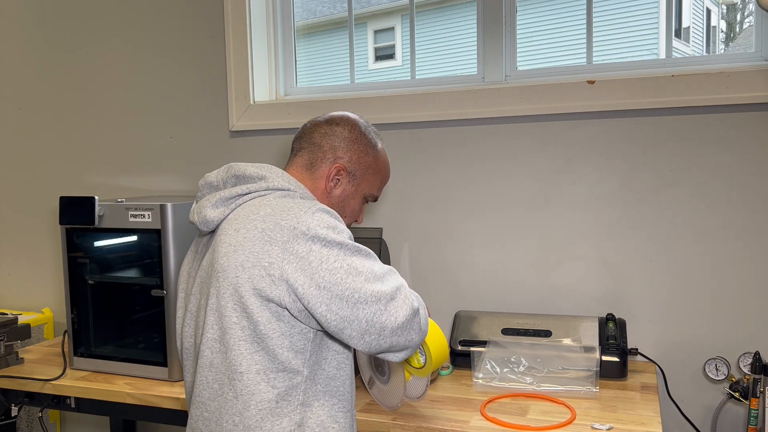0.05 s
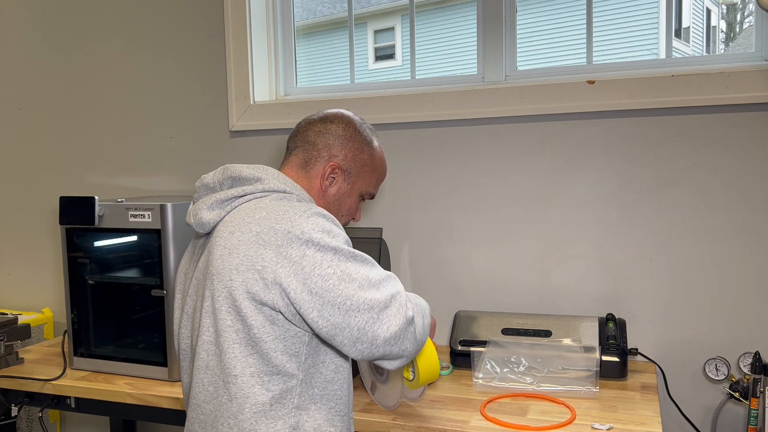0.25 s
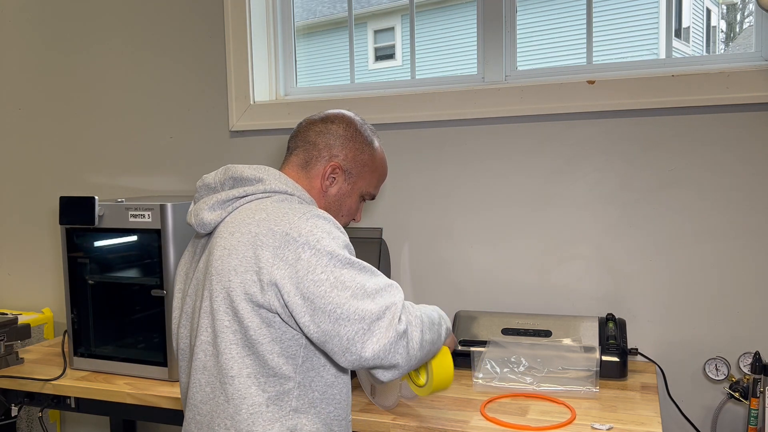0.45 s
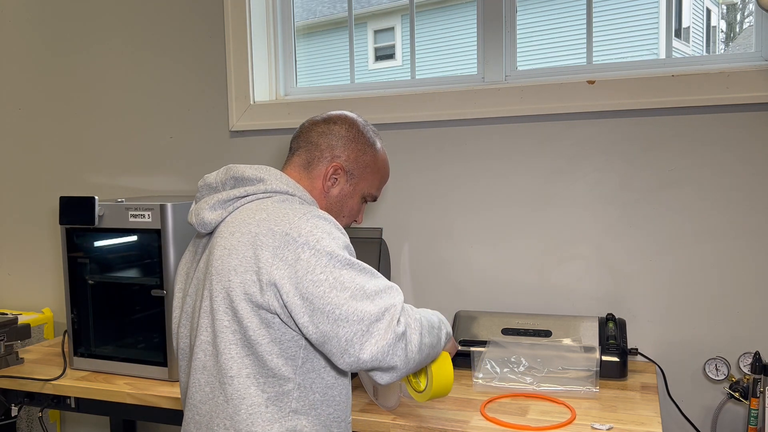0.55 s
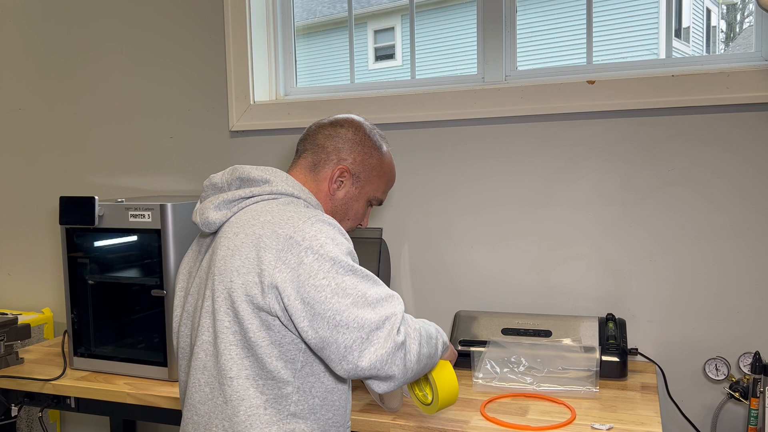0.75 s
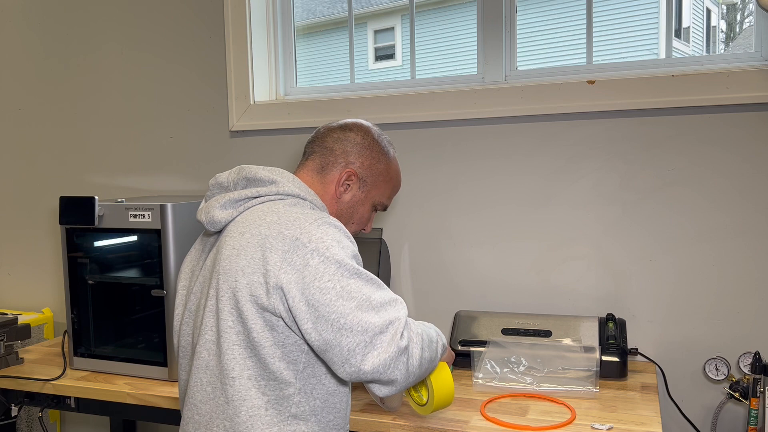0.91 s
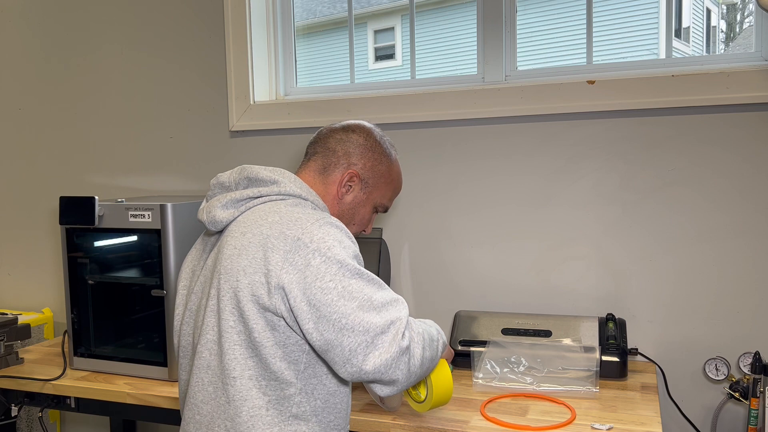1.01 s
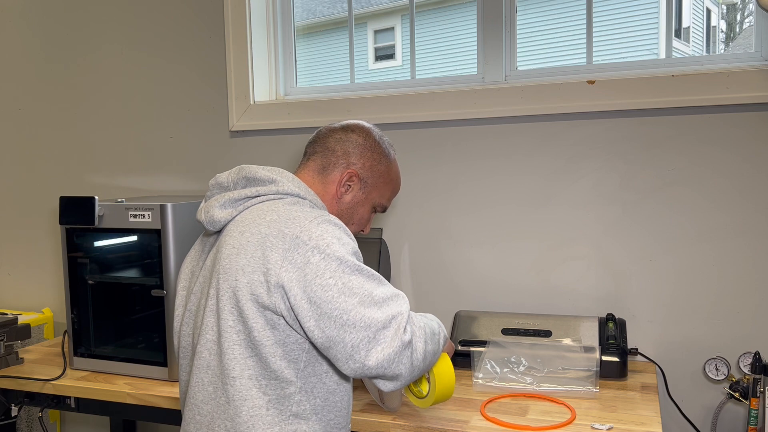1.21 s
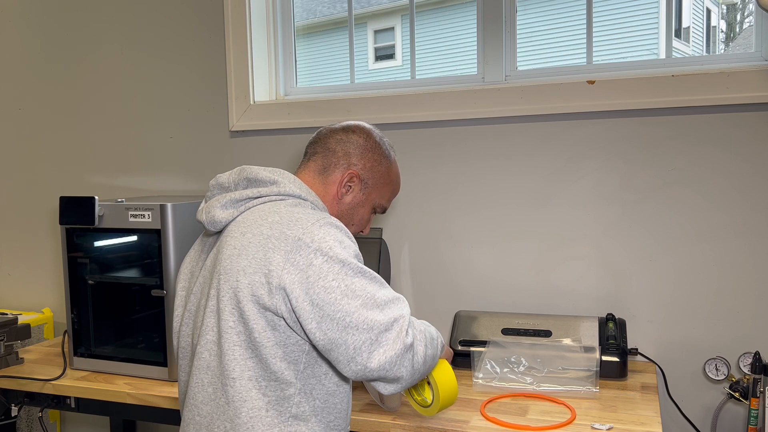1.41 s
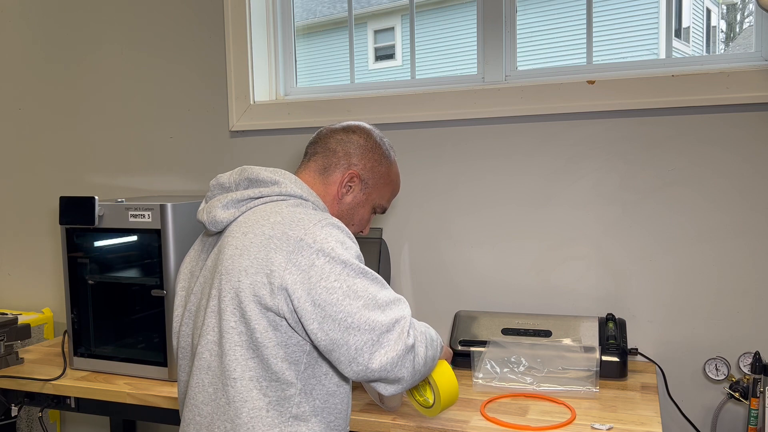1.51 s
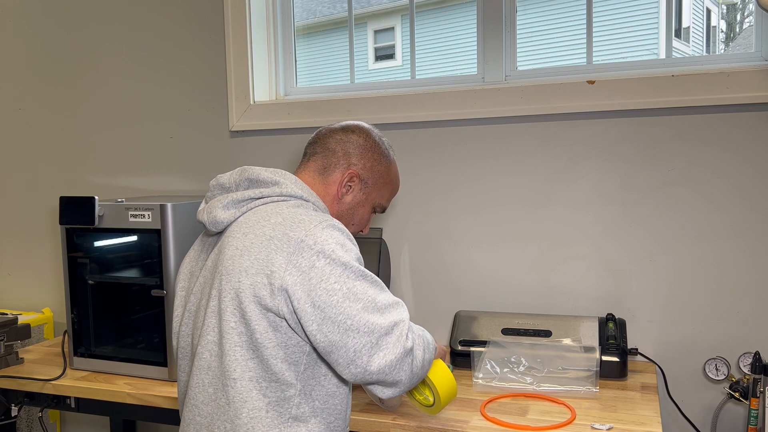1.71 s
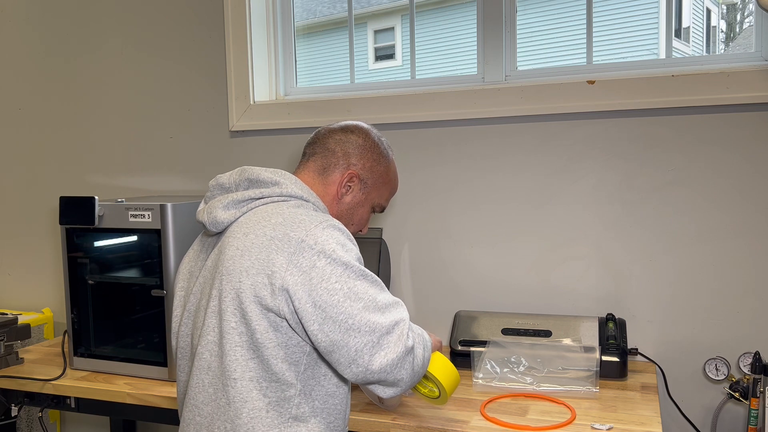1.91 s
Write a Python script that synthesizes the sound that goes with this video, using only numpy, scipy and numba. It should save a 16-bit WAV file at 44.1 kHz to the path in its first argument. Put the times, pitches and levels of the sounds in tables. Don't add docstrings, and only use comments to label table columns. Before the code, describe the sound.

A short, loud tear of adhesive tape, followed by separate crackling snaps and a double tap on a bench

```python
import sys
import numpy as np
from scipy import signal
from scipy.fft import rfft, irfft
from scipy.io import wavfile
from scipy.ndimage import uniform_filter1d
from numba import njit

SR = 44100
rng = np.random.default_rng(int(sys.argv[2]) if len(sys.argv) > 2 else 0)


def log_audio(samples):
    frames = np.atleast_2d(samples).T
    limited = np.clip(frames, -1, 1)
    pcm = np.round(limited * 32767).astype(np.int16)
    wavfile.write(sys.argv[1], SR, pcm)


def gain_from_db(level_db):
    decades = np.asarray(level_db, float) / 20
    return 10 ** decades


N = 85995


def unit(x):
    return x / np.sqrt(np.mean(x ** 2))


def ring(x, peaks):
    click = np.zeros(4096)
    click[0] = 1
    response = np.zeros(4096)
    for k, (hz, width_hz, db) in enumerate(peaks):
        b, a = signal.iirpeak(hz, hz / width_hz, fs=SR)
        response += (-1) ** k * gain_from_db(db) * signal.lfilter(b, a, click)
    return signal.fftconvolve(x, response / np.sqrt(np.sum(response ** 2)))[:N]


@njit
def moving_ring(x, hz, width_hz):
    y, band, low = np.empty(len(x)), 0., 0.
    for i in range(len(x)):
        g, k = np.tan(np.pi * hz[i] / SR), width_hz / hz[i]
        v = (band + g * (x[i] - low)) / (1 + g * (g + k))
        band, low, y[i] = 2 * v - band, low + 2 * g * v, k * v
    return y


def walk(rate_hz):
    hold = int(SR / rate_hz)
    levels = rng.standard_normal(N)[:N // hold + 1]
    return unit(uniform_filter1d(np.repeat(levels, hold)[:N], hold))


def bursts(rows, col, fall_s):
    t = np.arange(N) / SR
    envelope = np.zeros(N)
    for row, fall in zip(rows, fall_s):
        envelope += gain_from_db(row[col]) * (t >= row[0]) * np.exp(-np.maximum(t - row[0], 0) / fall)
    return envelope


def strikes(rows, col, fall_s):
    grit_db = -4
    x = gain_from_db(grit_db) * rng.standard_normal(N) * bursts(rows, col, fall_s)
    for row, fall in zip(rows, fall_s):
        x[int(row[0] * SR)] += gain_from_db(row[col]) * np.sqrt(fall * SR / 2)
    return x


def slips(rate_hz):
    scatter_db, biggest = 3.5, 3
    when, size, sign = rng.random(N), rng.exponential(1, N), rng.standard_normal(N)
    clicks = (when < rate_hz / SR) * np.sign(sign)
    return unit(clicks * gain_from_db(scatter_db * np.minimum(size, biggest)))


# t/s, peel level/dB, fizz over body/dB, strip resonance f/Hz, strip over body/dB
PULL = [
    (0, -69, -26.5, 3210, 5),
    (.14, -59, -6, 2770, -12.5),
    (0.179, -45, -7, 3080, -10.5),
    (.215, -44.5, 3.5, 2900, -8.5),
    (0.248, -29, -0.5, 2570, 1),
    (0.298, -60.5, -13.5, 2600, -3),
    (.33, -26.5, -2.5, 2600, 0),
    (.41, -25.5, -2.5, 1900, -7),
    (0.488, -35.5, 9, 2470, -6.5),
]
# t/s, size/dB, fall/s, strip note f/Hz
JERKS = [(.165, -42.5, .006, 2200), (.1845, -28.5, 0.003, 2970), (0.1924, -28, 0.002, 2600),
         (0.216, -28, 0.002, 2850), (0.233, -25, .003, 3000), (0.2425, -24, 0.004, 2710),
         (0.2464, -25.5, .002, 2500), (0.2657, -7.5, 0.00037, 2780), (0.287, -35.5, 0.003, 2700),
         (.315, -18.5, 0.0012, 2550), (0.323, -26.5, 0.0015, 2600), (0.326, -14, 0.001, 2500),
         (0.3458, -21, 0.0017, 2700), (0.355, -12, 0.00048, 2030), (.3755, -20.5, .001, 2300),
         (.386, -20, 0.001, 2000), (.394, -20.5, .001, 1700), (.402, -17.5, .001, 1900),
         (.417, -20, .001, 1970), (.444, -28, .001, 2200), (0.464, -22.5, 0.00038, 2320),
         (0.469, -30, 0.00033, 2000)]
# f/Hz, width/Hz, level/dB
BODY = [(420, 250, -2.5), (904, 740, -4), (1650, 510, 0.5), (2700, 1360, 2.5), (3670, 1700, -5)]
# f/Hz, width/Hz, level/dB
FIZZ = [(4930, 1500, -4.5), (6650, 670, 1.5), (9160, 1700, 0), (13210, 1300, 3), (14370, 5400, -4)]


def peel():
    slip_rate_hz, flutter_db, flutter_hz, release_s = 3500, 2.5, 140, 0.014
    strip_width_hz, jerk_width_hz, jerk_ring_db = 650., 650, -3.5
    t = np.arange(N) / SR
    when, level_db, fizz_db, strip_hz, strip_db = np.array(PULL).T
    fade = np.exp(-np.maximum(t - when[-1], 0) / release_s)
    pull = fade * gain_from_db(np.interp(t, when, level_db) + flutter_db * walk(flutter_hz) - 5)
    drive = slips(slip_rate_hz) * pull
    drive += strikes(JERKS, col=1, fall_s=[j[2] for j in JERKS]) * gain_from_db(-6)

    body = ring(drive, BODY) * gain_from_db(-1)
    fizz = ring(drive * gain_from_db(np.interp(t, when, fizz_db)), FIZZ) * gain_from_db(2.5)
    note_hz = np.interp(t, when, strip_hz) * (1 + .05 * walk(60))
    strip = moving_ring(drive, note_hz, strip_width_hz) * np.sqrt(SR / strip_width_hz / np.pi)
    strip *= gain_from_db(np.interp(t, when, strip_db))
    notes = np.zeros(N)
    for jerk in JERKS:
        notes += ring(strikes([jerk], col=1, fall_s=[jerk[2]]), [(jerk[3], jerk_width_hz, 0)])
    return body + strip + notes * gain_from_db(jerk_ring_db) + fizz


SNAP_S = 0.00038
# f/Hz, width/Hz, level/dB
AIR = [(12400, 9000, 0.54), (15400, 2000, -0.82)]
# f/Hz, width/Hz, level/dB
BENCH = [(202, 39, -6), (350, 130, -0.5), (675.5, 350, -1.5)]


def hits(rows, crack, body):
    fall_s = [SNAP_S] * len(rows)
    out = np.zeros(N)
    for col, modes in enumerate([crack, body, AIR], start=1):
        out += ring(strikes(rows, col, fall_s), modes)
    knock = bursts(rows, col=4, fall_s=fall_s)
    return out + gain_from_db(-24) * ring(ring(knock, BENCH), BENCH)


# t/s, crack/dB, roll ring/dB, air/dB, bench knock/dB
SNAPS = [
    (.0199, -47, -38.5, -44.5, -65),
    (.046, -39.5, -39, -45, -70),
    (.066, -43.5, -60, -39.5, -70),
    (.145, -35.5, -52, -35, -72),
    (.675, -13.5, -22.5, -15.5, -35.5),
    (.9285, -15.5, -31, -26.5, -42.5),
    (1.0185, -21, -29, -24.5, -56),
    (1.0815, -27, -31.5, -30, -39),
    (1.312, -66, -63, -54.5, -61),
    (1.553, -74, -44.5, -93, -52),
]
# f/Hz, width/Hz, level/dB
CRACK = [(4020, 1000, -23), (5170, 1800, 19), (6000, 1300, -2.5), (6300, 1000, 13.5), (7600, 980, -17.5)]
# f/Hz, width/Hz, level/dB
ROLL = [(1028, 400, -8), (1640, 260, 2), (2430, 300, -5), (3900, 500, -9)]


def snaps():
    return hits(SNAPS, CRACK, ROLL)


# t/s, click/dB, ring/dB, air/dB, bench knock/dB
TAPS = [
    (1.238, -88.5, -67, -82.5, -44),
    (1.372, -79, -54.5, -84, -64),
    (1.623, -49.5, -58, -72.5, -84),
    (1.634, -36.5, -50.5, -54.5, -90.5),
    (1.642, -18, -28, -21.5, -31),
    (1.66, -21.5, -30.5, -24.5, -42),
]
# f/Hz, width/Hz, level/dB
TAP_CLICK = [(3140, 360, -2), (3870, 500, 1.5), (4720, 320, 4), (6270, 1240, 4), (7560, 2000, -28)]
# f/Hz, width/Hz, level/dB
TAP_RING = [(605, 184, 0), (1640, 220, 2.5), (2740, 420, -2), (3500, 1000, -9)]


def taps():
    return hits(TAPS, TAP_CLICK, TAP_RING)


# t/s, low ring/dB, high ring/dB, thud/dB
KNOCKS = [
    (.675, -38.5, -29.5, -57),
    (0.9278, -39, -41, -49),
    (1.0185, -38.5, -41.5, -58),
    (1.0812, -33, -36.5, -54),
    (1.642, -32, -43.5, -50),
    (1.66, -33.5, -48, -50.5),
]
# f/Hz, width/Hz, level/dB
ROLL_LOW = [(1080, 193, 3), (560, 120, -1)]
# f/Hz, width/Hz, level/dB
ROLL_HIGH = [(2427, 93, 0), (3780, 380, -2)]


def knocks():
    thud_hz, end_hz, late_s, rise_s, sag_s = 480, 238, 0.00614, .008, 0.017
    fall_s, t = [SNAP_S] * len(KNOCKS), np.arange(N) / SR
    out = ring(strikes(KNOCKS, col=1, fall_s=fall_s), ROLL_LOW)
    out = out + ring(strikes(KNOCKS, col=2, fall_s=fall_s), ROLL_HIGH)
    for start_s, _, _, thud_db in KNOCKS:
        u = np.maximum(t - start_s - late_s, 0)
        turns = end_hz * u + (thud_hz - end_hz) * sag_s * (1 - np.exp(-u / sag_s))
        swell = u / rise_s * np.exp(1 - u / rise_s)
        out = out + gain_from_db(thud_db) * swell * np.sin(2 * np.pi * turns)
    return out


# t/s, hand and sleeve rumble/dB, bench boom/dB
HAND = [(0.0, -58, -58), (0.124, -51.5, -63), (0.19, -58.5, -56), (0.3, -56.5, -59), (0.481, -49.5, -59),
        (0.555, -60.5, -57.5), (0.662, -63, -67.5), (0.896, -93, -70), (0.95, -62, -65), (1.021, -66, -61),
        (1.058, -62, -76.5), (1.14, -75, -62), (1.438, -93, -75.5), (1.612, -86.5, -70.5), (1.65, -73, -75),
        (1.687, -55, -63), (1.808, -81.5, -71), (1.95, -69.5, -99)]
# f/Hz, width/Hz, level/dB
RUMBLE = [(136, 14, 3), (213.7, 17, 2.5), (287, 55, -5)]
# f/Hz, width/Hz, level/dB
BOOM = [(62, 53, -12.5), (87, 16, -1)]


def hand():
    when, rumble_db, boom_db = np.array(HAND).T

    def push(level_db):
        level = np.interp(np.arange(N) / SR, when, level_db) + 2 * walk(32)
        return gain_from_db(level) * rng.standard_normal(N)

    def lows():
        return ring(push(rumble_db), RUMBLE) + ring(push(boom_db), BOOM)

    return lows() + gain_from_db(-7.5) * np.array([[1], [-1]]) * lows()


BOUNCE_S = .00062
# delay t/s, left level/dB, right level/dB
ECHOES = [(BOUNCE_S, -2, -3), (.0034, 1.9, 2), (.0044, 1, 10.47), (.0092, -5.5, 4), (0.013, -3, -8.5),
          (.0175, -24.5, -21.5), (0.03, -14.5, -18.5)]
# f/Hz, t60/s, tail level/dB
ROOM = [(127, 0.25, -13.5), (313, 1, -10), (740, 0.58, 5), (1610, 0.71, -2.5), (2600, 0.65, 3),
        (4100, 0.74, 3.5), (6500, 0.64, 5), (10200, 0.34, 6.5), (13200, 0.4, -5.5)]


def room():
    tail_db, tail_rise_s = 3.5, 0.0009
    smear_s, scattered_share, echo_hz, echo_low_db = .00045, .4, 3000, -4
    t = np.arange(SR) / SR
    log_f = np.log(np.fft.rfftfreq(SR, 1 / SR) + 1)
    centres = np.log(np.array(ROOM).T[0])
    noise, response = rfft(rng.standard_normal((2, SR))), np.zeros((2, SR))
    for k, (_, t60_s, db) in enumerate(ROOM):
        band = irfft(noise * np.interp(log_f, centres, np.arange(len(ROOM)) == k))
        decay = gain_from_db(db + tail_db - 60 * t / t60_s)
        response += decay * band * np.sqrt(np.log(1e6) / t60_s / SR)
    response *= 1 - np.exp(-t / tail_rise_s)

    grit = rng.standard_normal(SR) + rng.standard_normal((2, SR))
    wall = np.zeros((2, SR))
    for lag_s, *db in ECHOES:
        smear = (t >= lag_s) * np.exp(-np.maximum(t - lag_s, 0) / smear_s)
        echo = smear * grit * scattered_share
        echo[:, int(lag_s * SR)] += np.sqrt(smear_s * SR)
        echo /= np.sqrt(np.sum(echo ** 2, axis=1, keepdims=True))
        wall += gain_from_db(np.array(db) - 4.5)[:, None] * echo
    lows = signal.lfilter(*signal.butter(1, echo_hz, fs=SR), wall)
    response += wall - (1 - gain_from_db(echo_low_db)) * lows
    response[:, 0] = gain_from_db(-5)
    return response


# f/Hz, density/dB per Hz
FLOOR = [(18, -42.5), (30, 14), (179, 0.5), (239, 1), (702, -6), (4780, -17), (9220, -31), (14800, -38.5),
         (16000, -24)]
# f/Hz, rms level/dB
WHINES = [(12620, -110), (15000, -96)]


def floor():
    floor_db = -71
    log_f = np.log(np.fft.rfftfreq(N, 1 / SR) + 1)
    hz, db = np.array(FLOOR).T
    shape = gain_from_db(np.interp(log_f, np.log(hz), db))
    hiss = unit(irfft(rfft(rng.standard_normal((2, N))) * shape, N))
    t = np.arange(N) / SR
    whines = np.zeros(N)
    for whine_hz, whine_db in WHINES:
        whines += gain_from_db(whine_db + 4.5 + 5.1 * walk(6.1)) * np.sin(2 * np.pi * whine_hz * t)
    return gain_from_db(floor_db + 0.62 * walk(8)) * hiss + whines


def scene():
    lead, earlier_db, pan_db = SR // 5, -59.5, 1
    earlier = gain_from_db(earlier_db) * ring(rng.standard_normal(N), FIZZ + BODY)[:lead]
    response = room()

    def in_room(before, x):
        source = np.r_[before, x][None] * gain_from_db(-4)
        return signal.fftconvolve(source, response, axes=1)[:, lead:lead + N]

    struck = in_room(np.zeros(lead), snaps() + taps() + knocks())
    rip = in_room(earlier, peel())
    pan = gain_from_db(np.array([[pan_db], [-pan_db]]) / 2)
    return rip + struck * pan + hand() + floor()


def low_pass(x):
    return signal.sosfilt(signal.butter(12, 16650, fs=SR, output="sos"), x)


# f/Hz, share of left in right, right lead/rad, gain/dB
PORTS = [(0, .9, 0, -14), (60, .9, 0, -1), (200, .8, 0, 0), (700, .1, 0, 0), (5200, .1, 0, 1),
         (7200, .1, 0, -3), (9000, .93, 2.7, -6), (9900, .97, 3.1, -16), (10600, .98, 3.35, -9),
         (11500, .85, 4.5, 1), (13450, .98, 6.28, 0), (16200, .75, 9, 3)]


def record(dry):
    top_hz = 15700
    f = np.fft.rfftfreq(N, 1 / SR)
    hz, left_share, lead_rad, gain_db = np.array(PORTS).T
    left, right = rfft(dry)
    share = np.interp(f, hz, left_share)
    right = gain_from_db(-1) * (share * left + np.sqrt(1 - share ** 2) * right)
    right = right * np.exp(1j * np.interp(f, hz, lead_rad))
    ports = irfft(np.array([left, right]) * gain_from_db(np.interp(f, hz, gain_db)), N)
    top_cut = signal.ellip(10, .2, 70, top_hz, fs=SR, output="sos")
    mix = signal.sosfilt(top_cut, ports)
    return low_pass(mix)


dry = scene()
out = record(dry)
log_audio(out)
```